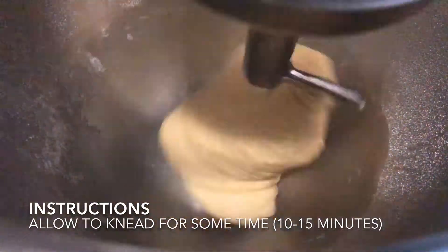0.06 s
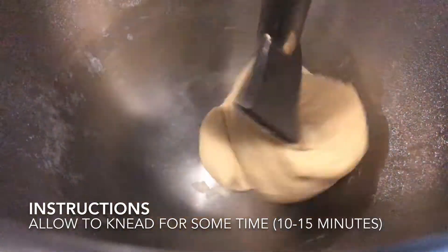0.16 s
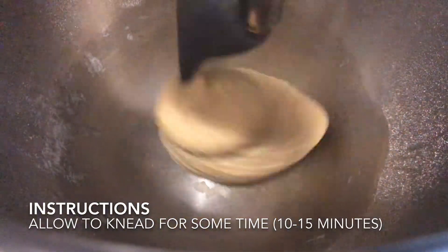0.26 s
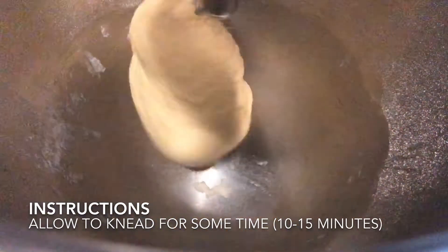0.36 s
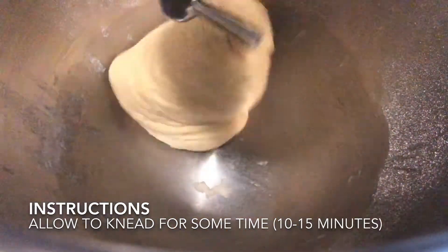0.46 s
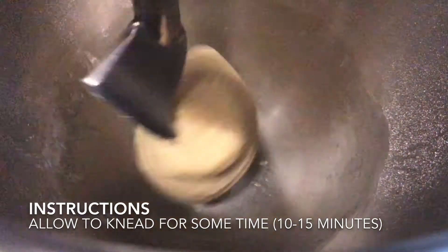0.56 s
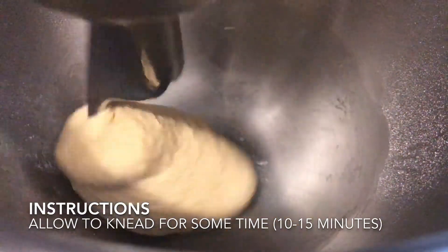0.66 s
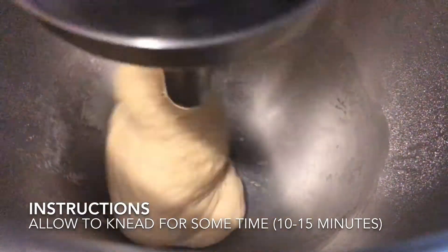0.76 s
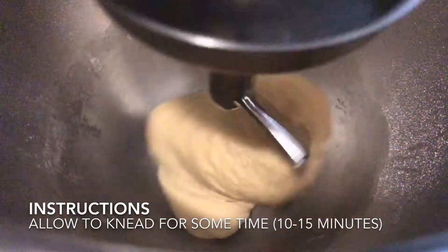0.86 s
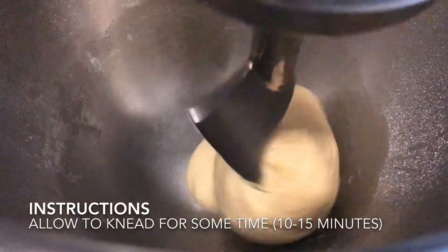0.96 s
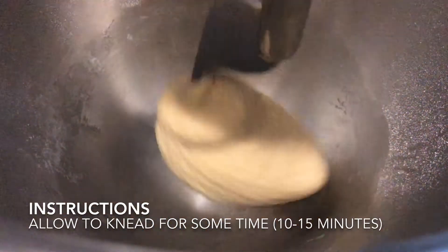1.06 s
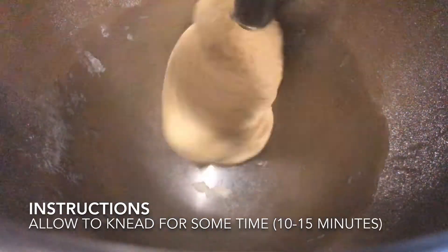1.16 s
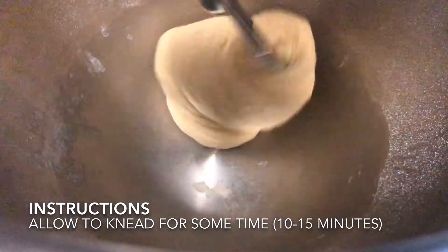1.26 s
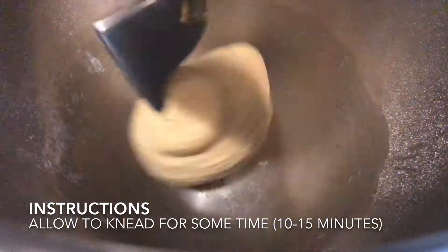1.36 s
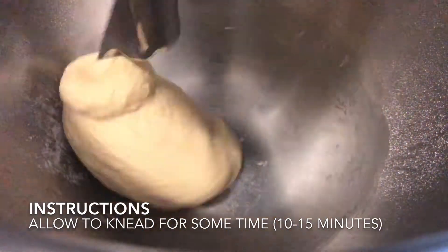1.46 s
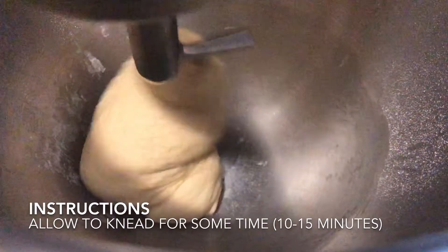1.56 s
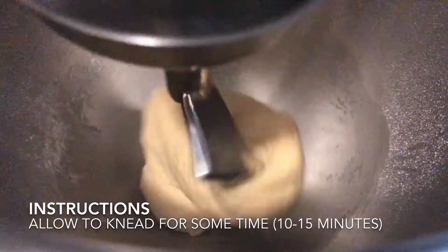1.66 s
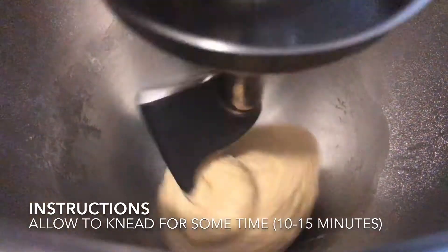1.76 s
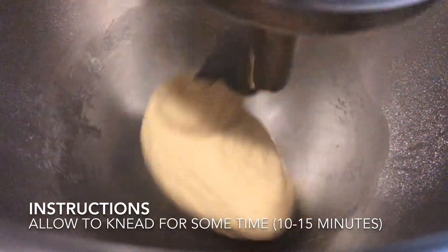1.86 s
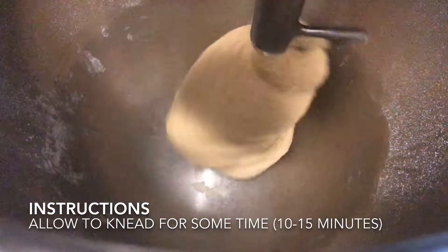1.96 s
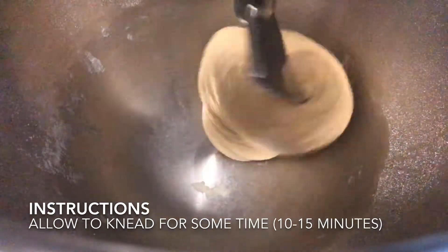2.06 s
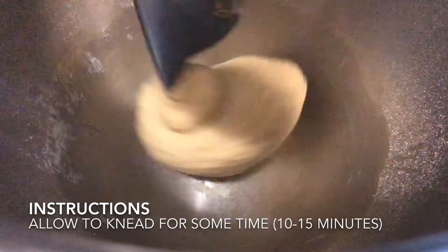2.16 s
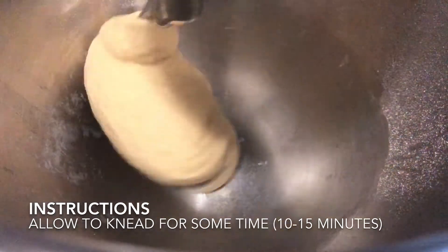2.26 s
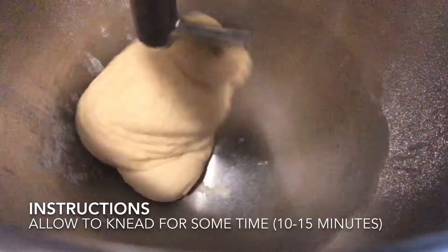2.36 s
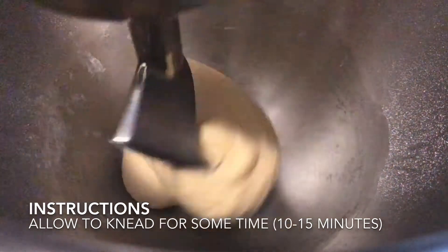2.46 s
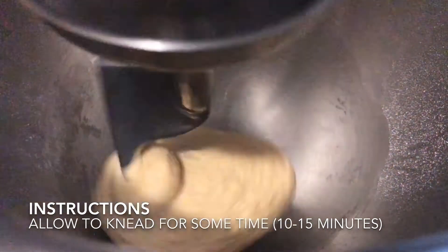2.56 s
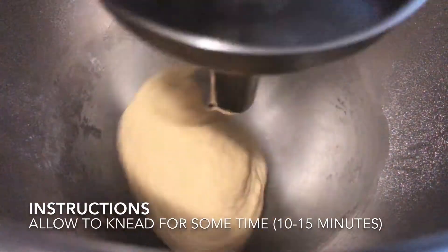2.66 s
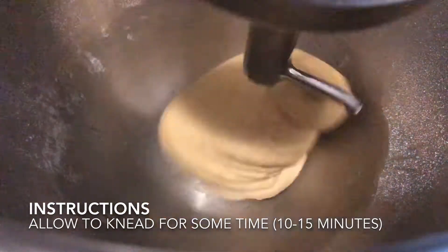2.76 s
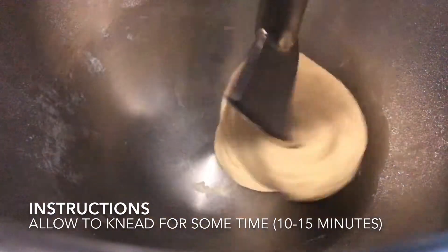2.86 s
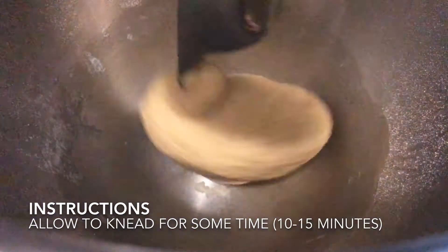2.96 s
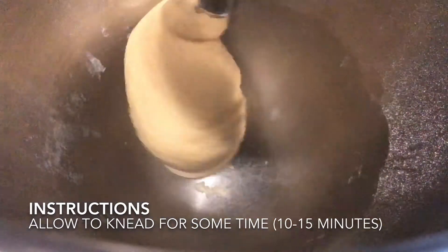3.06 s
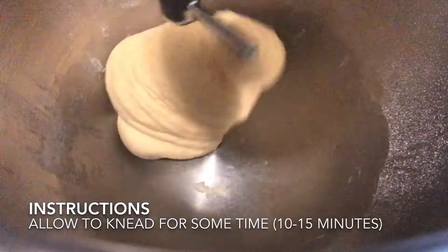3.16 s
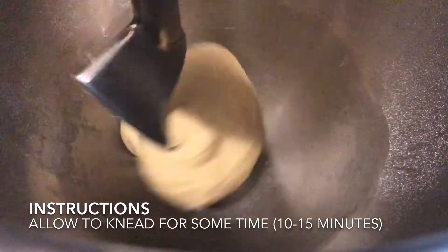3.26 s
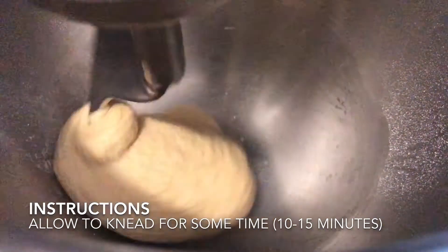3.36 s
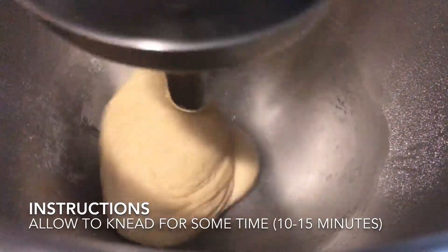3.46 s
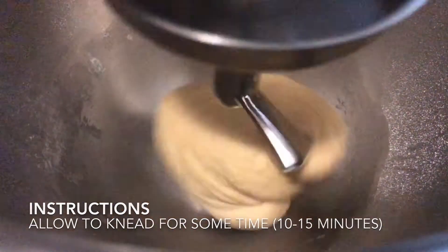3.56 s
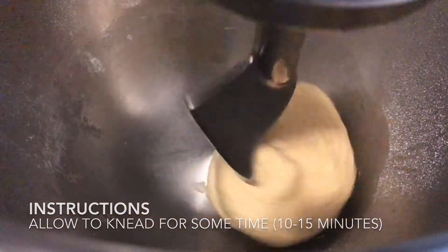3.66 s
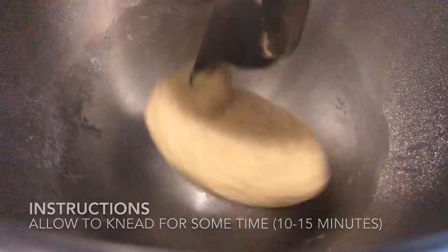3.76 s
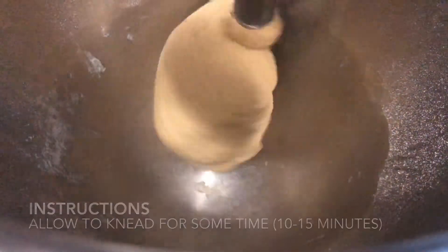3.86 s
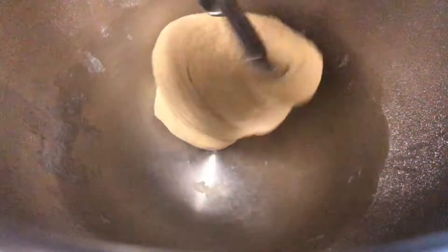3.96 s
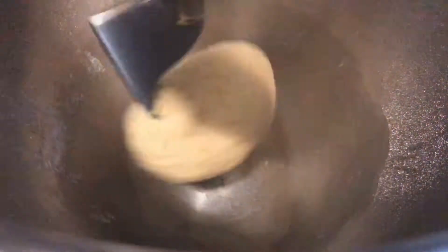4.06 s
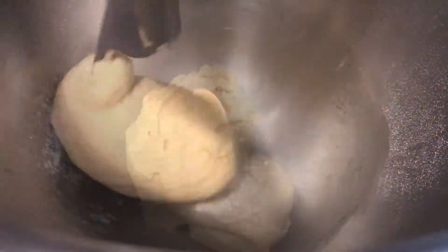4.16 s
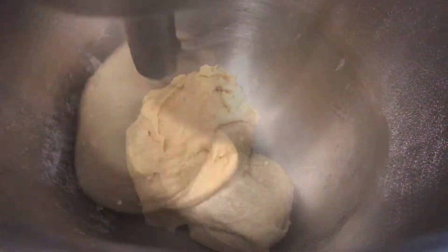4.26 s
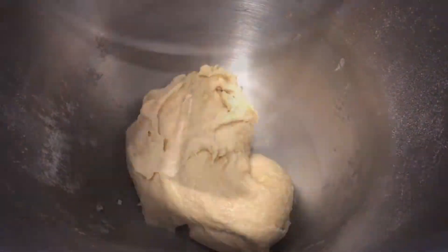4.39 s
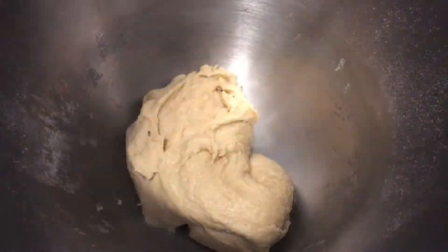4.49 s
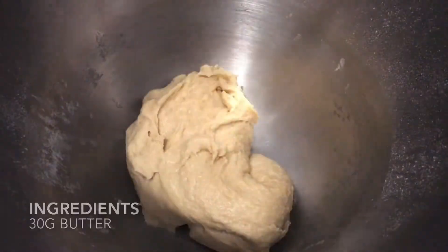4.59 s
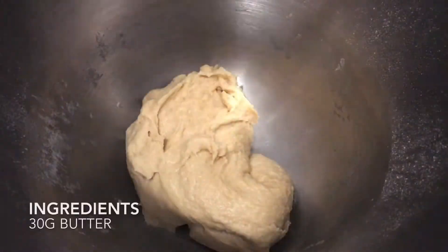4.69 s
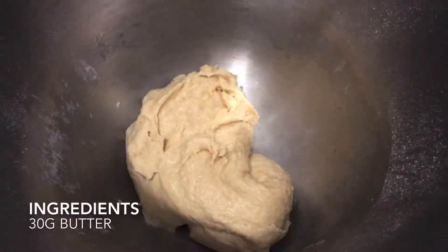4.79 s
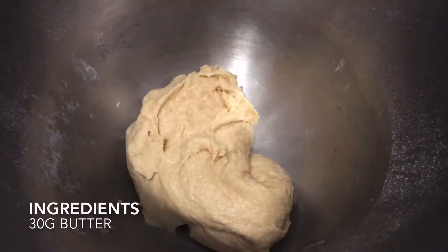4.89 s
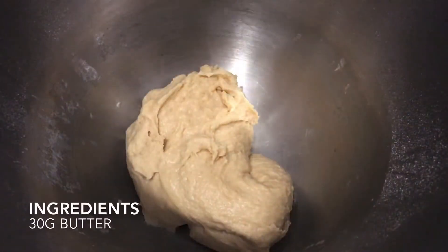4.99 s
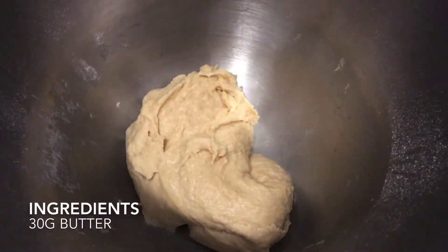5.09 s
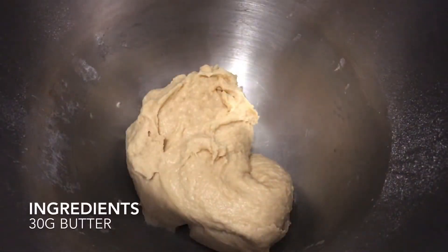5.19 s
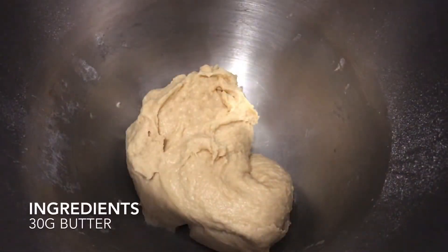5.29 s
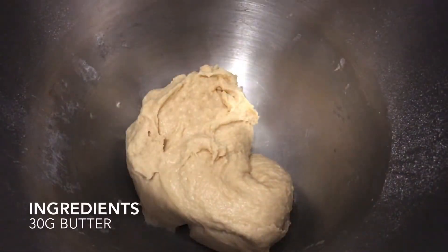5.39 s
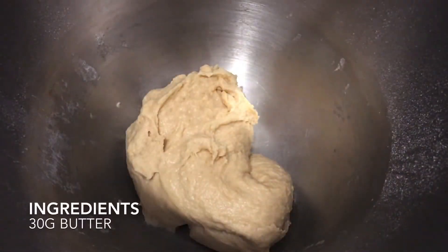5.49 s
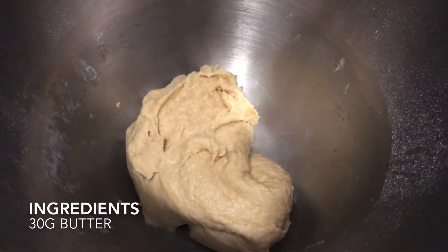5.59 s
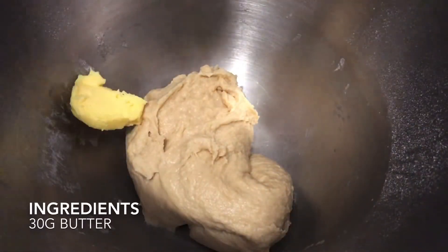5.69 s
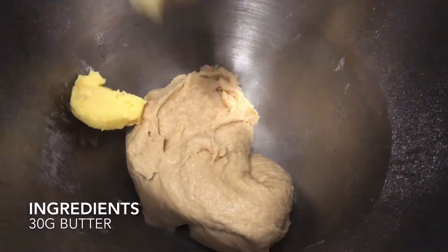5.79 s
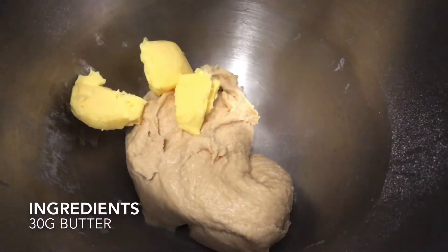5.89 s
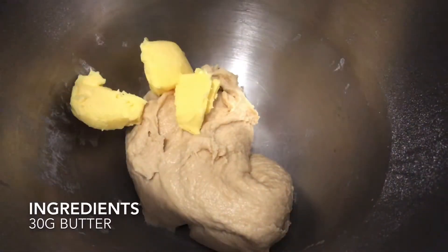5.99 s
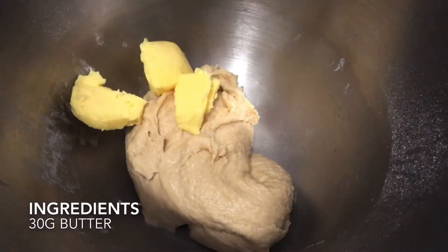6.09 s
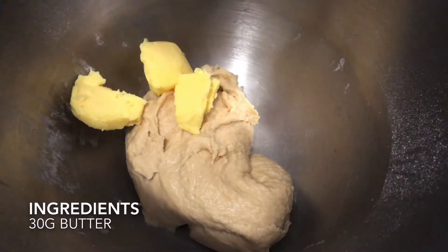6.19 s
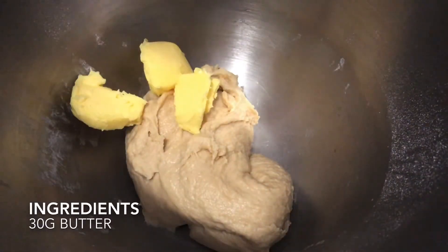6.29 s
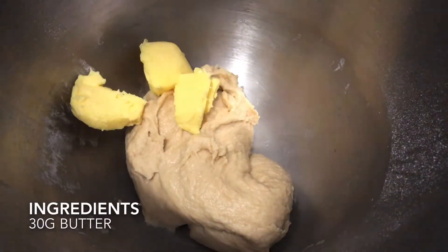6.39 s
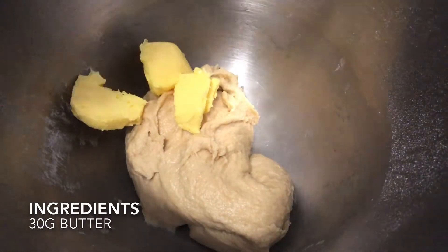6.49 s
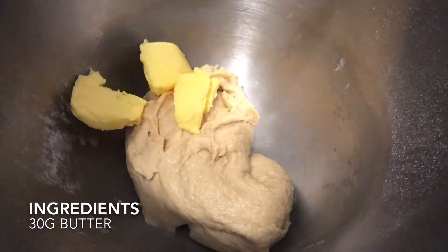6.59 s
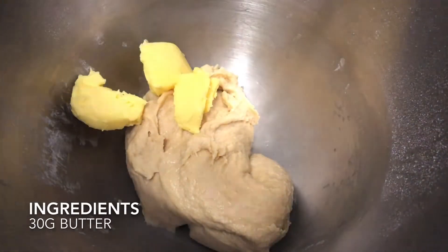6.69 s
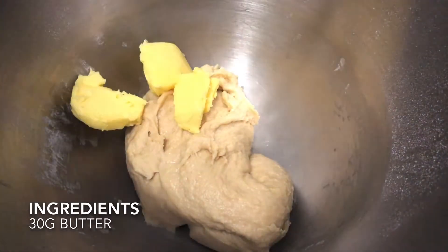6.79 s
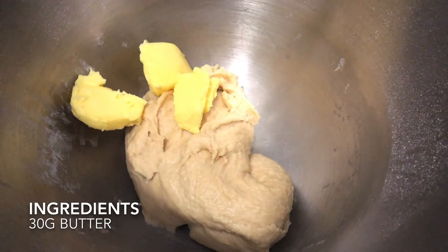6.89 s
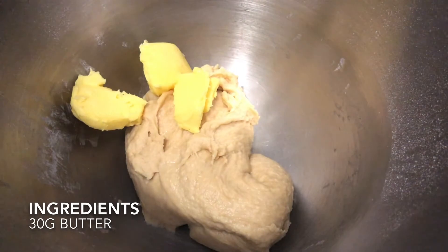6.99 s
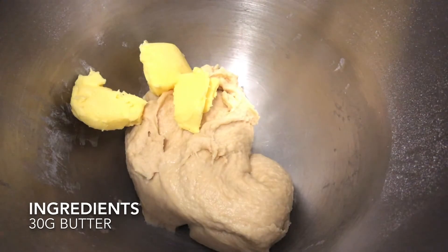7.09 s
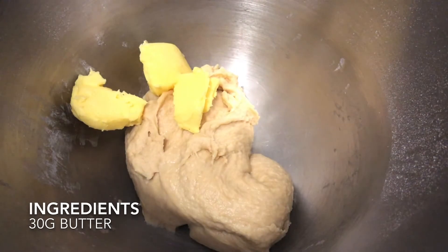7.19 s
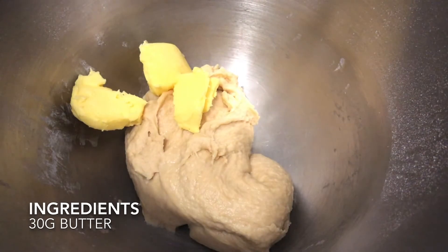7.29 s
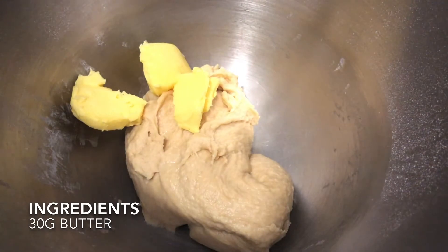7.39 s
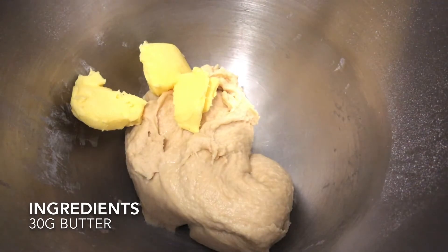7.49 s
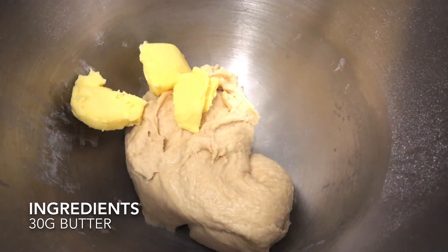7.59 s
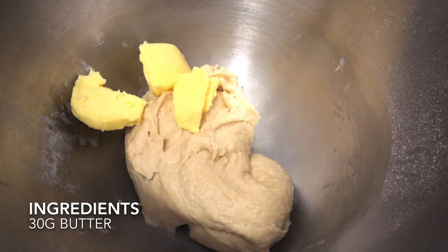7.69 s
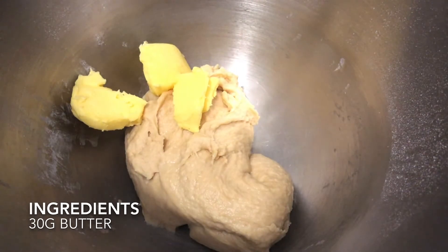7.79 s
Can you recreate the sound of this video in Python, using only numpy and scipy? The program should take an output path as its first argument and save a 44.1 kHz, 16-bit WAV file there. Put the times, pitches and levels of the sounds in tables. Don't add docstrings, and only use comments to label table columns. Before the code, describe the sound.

A stand mixer runs close by, its brush motor buzzing and whining, dipping slightly as the hook digs into dough, which booms dully against the steel bowl. After four seconds it fades quickly to a quiet kitchen with low fridge hum. Small counter ticks follow, then a bright spoon clink with a thud and a hard, wet butter slap. Close phone microphone, faint hiss.

```python
import sys
import numpy as np
from scipy import signal
from scipy.fft import rfft, irfft, next_fast_len
from scipy.io import wavfile
from scipy.ndimage import uniform_filter1d, map_coordinates

SR = 44100
rng = np.random.default_rng(int(sys.argv[2]) if len(sys.argv) > 2 else 0)


def rack_gain(trim_db):
    fader = np.asarray(trim_db, float)
    return 10 ** (fader / 20)


def wav_out(sig):
    wavfile.write(sys.argv[1], SR, np.round(np.clip(np.atleast_2d(sig).T, -1, 1) * 32767).astype(np.int16))


N = 346185


def unit(x):
    return x / np.sqrt(np.mean(x ** 2) + 1e-20)


def along(points, hz):
    f, value = np.transpose(points)
    return np.interp(np.log(hz + 1), np.log(f + 1), value)


def wobble(rate):
    knots = rng.standard_normal(int(N * rate / SR) + 4)
    return map_coordinates(knots, [np.arange(N) * rate / SR])


def bells(rows):
    t = np.arange(N) / SR
    return sum(height * np.exp(-0.5 * ((t - s) / spread) ** 2) for s, height, spread in rows)


def plateaus(rows, edge_s):
    t = np.arange(N) / SR
    step = lambda s: np.tanh(2 * (t - s) / edge_s)
    return sum(height * (step(start) - step(end)) / 2 for start, end, height in rows)


def filtered(x, response):
    m = next_fast_len(len(x) + SR // 2)
    return irfft(rfft(x, m) * response(np.fft.rfftfreq(m, 1 / SR)), m)[:len(x)]


def below(f, hz, power=4):
    return 1 / (1 + (f / hz) ** power)


def above(f, hz, power=4):
    return 1 / (1 + (hz / (f + 1)) ** power)


def resonances(modes, f):
    total = 0
    for k, (hz, width, db) in enumerate(modes):
        total = total + (-1) ** k * rack_gain(db) * 1j * f * width / (hz * hz - f * f + 1j * f * width)
    return total


def patchy(depth_db):
    z = signal.stft(rng.standard_normal(N), nperseg=512)[2]
    field = uniform_filter1d(rng.standard_normal(z.shape), 4, axis=0)
    field = uniform_filter1d(field, 12, axis=1)
    return unit(signal.istft(z * rack_gain(depth_db * unit(field)), nperseg=512)[1][:N])


def steadied(x, share):
    power = np.abs(uniform_filter1d(x ** 2, size=3000))
    return unit(x / (power + 1e-12) ** (share / 2))


def tone(turns, sway_db, blur):
    level = np.sqrt(2) * rack_gain(sway_db * wobble(9))
    return level * np.sin(2 * np.pi * turns + blur * wobble(25) + rng.uniform(0, 6.93))


def ring(modes, t, attack):
    total = sum(rack_gain(db - 60 * t / t60) * np.sin(2 * np.pi * hz * t) for hz, db, t60 in modes)
    return total * (1 - np.exp(-t / attack))


def add(track, s, sound):
    track[round(s * SR):][:len(sound)] += sound


def shaft_speed():
    # (time [s], speed lost [turns/s], spread [s])
    kneads = [(0.153, 0.96, 0.182), (0.417, 2.2, 0.09), (0.837, 2.03, 0.133), (1.31, 2.37, 0.083),
              (1.605, 1.71, 0.134), (2.117, 2.52, 0.086), (2.377, 1.31, 0.253), (3.023, 2.09, 0.113),
              (3.281, 1.64, 0.124), (3.772, 2.27, 0.143), (4.027, 1.26, 0.049)]
    return 74.52 - bells(kneads)


def orders(shaft, speed, wheel):
    multiples = np.array([1, 1.21, 4, 8, 12, 19, 23, 24, 28.1, 35, 36, 48, 60, 61, 72, 84, 85])
    levels_db = [-23, -21.5, -15, -27, -24.5, -24.5, -23, -26, -39, -26.5, -20, -21, -21.5, -36, -32, -30,
                 -23.5]
    strain = {23: (1.35, 0.92), 24: (-6, 0.093), 36: (1.3, .1)}
    load = (73.2 - speed) / 0.83
    lines = np.zeros(N)
    for k, db in zip(multiples, levels_db):
        load_db, depth = strain.get(k, (0, 0))
        line = tone(k * shaft, sway_db=2.5, blur=min(0.063 * k, 0.9))
        lines += rack_gain(db + load_db * load) * (1 + depth * wheel) * line
    return lines


def casing(shaft, speed):
    # (frequency [Hz], level [dB])
    valleys = [(25, -42), (60, -3.5), (160, -3.5), (500, 0.5), (800, 4), (1270, 3), (1500, 1), (2000, 0),
               (2100, -0.5), (3100, -8), (4000, -6.5), (4650, -13.5), (8000, -18), (12000, -21.5),
               (15500, -17)]
    # (frequency [Hz], width [Hz], level [dB])
    shell_modes = [(129.5, 35.6, 14), (538, 22, 4), (576.5, 83, 9), (676, 56, -2), (756, 19, 0),
                   (999, 108, 4), (1406, 94, -6.5), (1552, 162, 6.5), (1696, 102, 5.5), (1749, 15, -1),
                   (1884, 218, 4.5), (2355, 217, 3), (2596, 16.5, 0.5), (2756, 350, -1.5), (3363, 127, 4.5),
                   (3697, 163, 1.5), (4420, 110, -5.5), (5420, 220, -2), (6250, 190, -1), (7300, 300, -11)]
    # (frequency [Hz], width [Hz], level [dB])
    vent_modes = [(6720, 120, -3.5), (7740, 80, 2), (8250, 130, -11), (8460, 120, -19), (9550, 220, -7),
                  (10920, 230, -1), (12080, 250, 0), (13300, 250, -7), (14200, 230, -17), (15720, 73, -8)]
    wheel = np.sin(2 * np.pi * shaft / 4.7)
    beat = 1 + 0.062 * wheel + 0.04 * np.sin(2 * np.pi * shaft) + 0.035 * np.sin(8 * np.pi * shaft)
    drive = patchy(depth_db=1.5) * beat + orders(shaft, speed, wheel)

    def radiation(f):
        humps = sum(rack_gain(db) / (1 + ((f - hz) / (width / 2)) ** 4) for hz, width, db in shell_modes + vent_modes)
        return rack_gain(along(valleys, f)) * (1 + humps)

    shell = filtered(drive, lambda f: radiation(f) * below(f, 3500))
    fan = filtered(drive, lambda f: radiation(f) * above(f, 3500))
    return rack_gain(-0.01) * unit(shell) + rack_gain(-6.5) * unit(fan)


def base(shaft):
    rocking = rack_gain(4.5 * np.cos(2 * np.pi * (shaft / 10.1 - 0.22)))
    hum = filtered(rng.standard_normal(N), lambda f: resonances([(216.5, 38.6, 0)], f) ** 2)
    return rack_gain(-7.5) * unit(rocking * hum)


def coil_buzz():
    # (frequency [Hz], level [dB])
    mains = [(300, -41), (400, -34.5)]
    t = np.arange(N) / SR
    return sum(rack_gain(db + 29.5) * tone(hz * t, sway_db=1.5, blur=0.13) for hz, db in mains)


def hook():
    # (frequency [Hz], width [Hz], level [dB], time of a peak [s])
    shaded_bands = [(3758, 154, -16.5, 0.22), (1072, 200, -18, 0.34)]
    turn_s = 0.884
    t = np.arange(N) / SR
    total = np.zeros(N)
    for hz, width, db, s in shaded_bands:
        band = filtered(rng.standard_normal(N), lambda f: resonances([(hz, width, 0)], f) ** 2)
        total += rack_gain(db + 4.8 * np.cos(2 * np.pi * (t - s) / turn_s)) * unit(band)
    return total


def steel(f):
    # (frequency [Hz], width [Hz], level [dB])
    bowl_modes = [(300, 32, -6), (329.3, 30.2, 1), (359.4, 29, 1.5), (400, 36.8, -4), (424.5, 56.5, -11.5)]
    return resonances(bowl_modes, f) * below(f, 520, 8) * above(f, 250, 8)


def bowl():
    # (time [s], swell [dB], spread [s])
    swings = [(.134, 6, 0.041), (.226, 9.5, 0.014), (.413, 5, 0.11), (.663, 6, 0.042), (.76, 3, 0.047),
              (.95, 7, 0.027), (1.068, 10, 0.011), (1.173, 6.5, 0.047), (1.261, 8.5, 0.014),
              (1.402, 7.5, 0.014), (1.478, 8.5, 0.024), (1.637, 6, 0.055), (1.87, 5.5, 0.035),
              (2.017, 4, 0.04), (2.306, 10, 0.016), (2.376, 8, 0.03), (2.55, 7.5, 0.046),
              (2.795, 5.5, 0.029), (2.85, 5.5, 0.019), (3.022, 8.5, 0.011), (3.135, 6.5, 0.028),
              (3.345, 2, .018), (3.39, 6, 0.12), (3.6, 5.5, 0.018), (3.966, 6.5, 0.058), (4.12, 6.5, 0.011),
              (4.186, 8.5, 0.047), (4.32, 6, 0.013), (4.43, 6, 0.017)]
    rattle = rng.standard_normal(N) * rack_gain(2.4 * wobble(45))
    return rack_gain(-30.8 + bells(swings)) * steadied(filtered(rattle, steel), share=1.0)


def dough_slaps():
    # (time [s], peak level [dB])
    slap_rows = [(0.145, -25), (0.354, -5), (0.617, -6), (0.995, -15), (1.256, 0), (1.388, -1), (1.576, -3),
                 (2, -3.5), (2.119, -11), (2.557, -6), (2.793, -22), (3.106, -28), (3.328, 3.5),
                 (3.532, -24), (3.904, -19), (4.174, -8.5)]
    blows = np.zeros(N)
    for s, db in slap_rows:
        blows[int(s * SR)] = rack_gain(db + 34)
    return filtered(blows, steel)


def pin_squeaks():
    # (time [s], level [dB], frequency [Hz])
    squeak_rows = [
        (.546, -25, 7230),
        (1.355, -35, 7300),
    ]
    track, t = np.zeros(N), np.arange(2000) / SR
    for s, db, hz in squeak_rows:
        add(track, s, ring([(hz, db, 0.05)], t, attack=0.0021))
    return track


def mixer():
    speed = shaft_speed()
    shaft = np.cumsum(speed) / SR
    fade_from_s, fade_to_s = 4.003, 4.51
    running = np.clip((fade_to_s - np.arange(N) / SR) / (fade_to_s - fade_from_s), 0, 1)
    body = casing(shaft, speed) + base(shaft) + coil_buzz() + hook()
    return running * (rack_gain(-33) * body + bowl()) + dough_slaps() + pin_squeaks()


def room_air():
    # (frequency [Hz], density [dB per Hz])
    room_colour = [(15, -58), (25, -36), (43, -10.5), (86, -8.5), (119, 3.5), (179, -9), (241, -5.5),
                   (333, -13), (361, -3), (391, -19.5), (788, -24), (1000, -27.5), (1430, -27.5),
                   (15700, -56.5)]
    # (start [s], end [s], lift [dB])
    stirs = [
        (5.52, 6.15, 5),
        (6.45, 6.6, 1.5),
        (6.75, 7.0, 2),
    ]
    stir_db = plateaus(stirs, edge_s=0.12)
    colour = lambda f: rack_gain(along(room_colour, f))
    rumble = filtered(patchy(depth_db=-0.5), lambda f: colour(f) * below(f, 300))
    air = filtered(patchy(depth_db=0.9), lambda f: colour(f) * above(f, 300))
    return rack_gain(-56.5 + stir_db) * steadied(rumble, share=0.55) + rack_gain(-62 + 0.23 * stir_db) * unit(air)


def fridge():
    # (frequency [Hz], level [dB])
    hum_lines = [(120, -65), (242, -67.5), (365, -67), (1459, -82)]
    t = np.arange(N) / SR
    return sum(rack_gain(db) * tone(hz * t, sway_db=-1.5, blur=0.67) for hz, db in hum_lines)


def pump():
    # (start [s], end [s], lift [dB])
    surges = [
        (5.65, 5.9, 7),
        (5.96, 6.29, 14),
        (6.41, 6.79, 11.5),
        (7.36, 8, 10),
    ]
    t = np.arange(N) / SR
    on_s, top_hz, gap_hz, lag_s = 5.3, 805, 202, 0.5
    hz = top_hz - gap_hz * np.exp(-np.maximum(t - on_s, 0) / lag_s)
    level = rack_gain(-80.5 + plateaus(surges, edge_s=0.093))
    return (t > on_s) * level * tone(np.cumsum(hz) / SR, sway_db=-3.0, blur=0.2)


def pipe():
    t = np.arange(N) / SR
    peak_s, rise_db_per_s, fall_db_per_s = 6.97, 230, 90
    groan_db = -65.5 - np.maximum(rise_db_per_s * (peak_s - t), fall_db_per_s * (t - peak_s))
    return rack_gain(groan_db) * tone(470 * t, sway_db=2.5, blur=2.0)


def burst(t, db, t60):
    return rack_gain(db - 60 * t / t60) * rng.standard_normal(len(t))


def counter_ticks():
    # (time [s], knock level [dB], knock frequency [Hz], knock width [Hz], click level [dB])
    tick_rows = [(4.9125, -55.5, 2000, 900, -46), (4.9135, -53, 1100, 500, -62),
                 (4.965, -62, 5450, 300, -51), (5.07, -45.5, 980, 400, -55), (5.408, -69, 800, 400, -67),
                 (5.603, -56, 800, 600, -55), (5.6775, -63, 1200, 500, -51), (6.163, -51, 800, 1090, -60),
                 (6.1632, -63, 2300, 800, -64), (6.37, -63, 910, 700, -62), (6.4465, -54, 795, 700, -54),
                 (6.446, -73, 3380, 900, -72), (6.98, -56, 800, 400, -67)]
    # (frequency [Hz], width [Hz], level [dB])
    counter_modes = [(520, 460, -9)]
    track, t = np.zeros(N), np.arange(SR // 2) / SR
    contact = lambda f: 1j * f / (600 + 1j * f) / (1 + 1j * f / 7000) ** 4
    for s, db, hz, width, click_db in tick_rows:
        body = lambda f: resonances([(hz, width, 0)], f) ** 2 + resonances(counter_modes, f) ** 2
        add(track, s, filtered(burst(t, db + 19.5, 0.037), body))
        add(track, s, filtered(burst(t, click_db + 4.5, 0.0077), contact))
    return track


def spoon_and_butter():
    # (time [s], spoon level [dB], slap level [dB], slap t60 [s], bowl level [dB])
    blow_rows = [
        (5.6907, -40.5, -50, .04, -70),
        (5.6934, -61, -60, .03, -70),
        (5.8618, -90, -40, 0.0086, -60),
        (5.863, -90, -15.5, 0.0097, -54),
        (5.8661, -90, -25.5, 0.012, -20),
    ]
    # (frequency [Hz], level [dB], t60 [s])
    spoon_modes = [(3332, -20, .2), (3760, -13, .32), (3815, -15, .3), (4032, -10, .12), (4250, -18, .2),
                   (4510, -17, .22), (4651, -16, .22), (4850, -16, .33), (4875, -18, .33), (5400, -18, .15),
                   (6000, -20, .12), (6750, -16, .1)]
    # (frequency [Hz], width [Hz], level [dB])
    dense_modes = [(4000, 820, 5), (5000, 930, 4), (6430, 1450, -3), (3240, 300, -3)]
    # (frequency [Hz], width [Hz], level [dB])
    smack = [(1390, 970, 3), (4240, 450, 4.5), (7230, 740, 2), (10000, 1400, -5), (13400, 5000, -5.5)]
    # (frequency [Hz], width [Hz], level [dB])
    tiles = [(4200, 3500, -1), (7200, 4000, 1), (10000, 3000, -5)]
    # (frequency [Hz], level [dB], t60 [s])
    empty_bowl = [(363, -1.5, 0.07), (388, -18, .2), (1050, -8.5, 0.037), (1440, -15, 0.016)]
    track, t = np.zeros(N), np.arange(SR // 2) / SR
    for s, spoon_db, slap_db, t60, bowl_db in blow_rows:
        chatter = burst(t, spoon_db + 9.0, 0.067) + burst(t, spoon_db - 2.5, 0.2)
        add(track, s, filtered(chatter, lambda f: resonances(dense_modes, f) * 1j * f / (3000 + 1j * f)))
        add(track, s, rack_gain(spoon_db + 0.5) * ring(spoon_modes, t, attack=0.00035))
        add(track, s, filtered(burst(t, slap_db, t60), lambda f: resonances(smack, f)))
        add(track, s, filtered(burst(t, slap_db - 38, 0.3), lambda f: resonances(tiles, f)))
        add(track, s, rack_gain(bowl_db) * ring(empty_bowl, t, attack=0.00026))
    return track


def thuds():
    # (time [s], frequency [Hz], level [dB], t60 [s])
    thud_rows = [(5.6811, 350, -39, .07), (5.6948, 300, -30, .04), (5.7050, 105, -34, .12),
                 (5.6970, 122, -40, .03), (5.87, 115, -42, .12)]
    track, t = np.zeros(N), np.arange(SR // 2) / SR
    for s, hz, db, t60 in thud_rows:
        add(track, s, ring([(hz, db, t60)], t, attack=0.0012))
    return track


def walls(x):
    # (frequency [Hz], t60 [s])
    decay = [(200, 1), (2000, 0.66), (10000, 0.35)]
    hz, t, z = signal.stft(rng.standard_normal(SR // 2), SR, nperseg=256)
    tail = signal.istft(z * rack_gain(-60 * t / along(decay, hz)[:, None]), SR, nperseg=256)[1]
    delayed = np.pad(x, (300, 0))
    return signal.fftconvolve(delayed, tail / np.linalg.norm(tail))[:N]


def scene():
    kitchen = room_air() + fridge() + pump() + pipe()
    near = counter_ticks() + spoon_and_butter() + thuds()
    return (mixer() + kitchen + near + rack_gain(-20) * walls(near))[None]


def band_limit(x):
    return signal.sosfilt(signal.butter(12, 16870, fs=SR, output="sos"), x)


def record(dry):
    hiss = rack_gain(-77.0) * rng.standard_normal(N)
    mix = filtered(dry[0] + hiss, lambda f: f < 15790)[None]
    return band_limit(mix)


dry = scene()
out = record(dry)
wav_out(out)
```